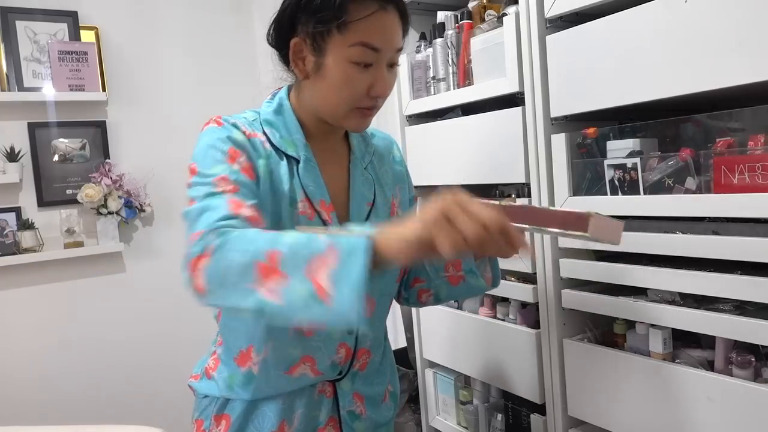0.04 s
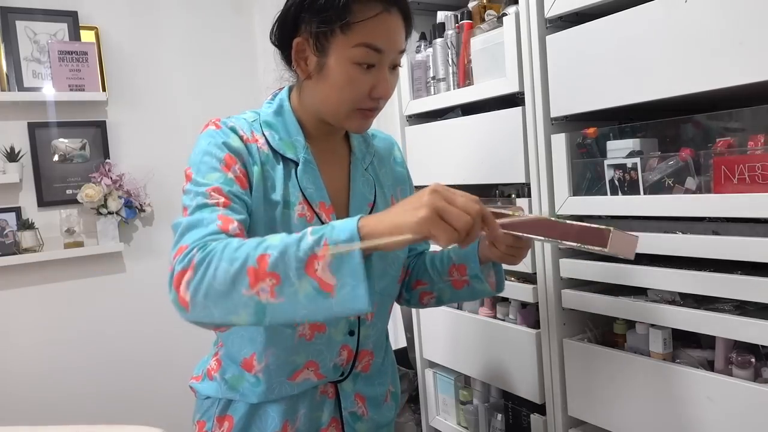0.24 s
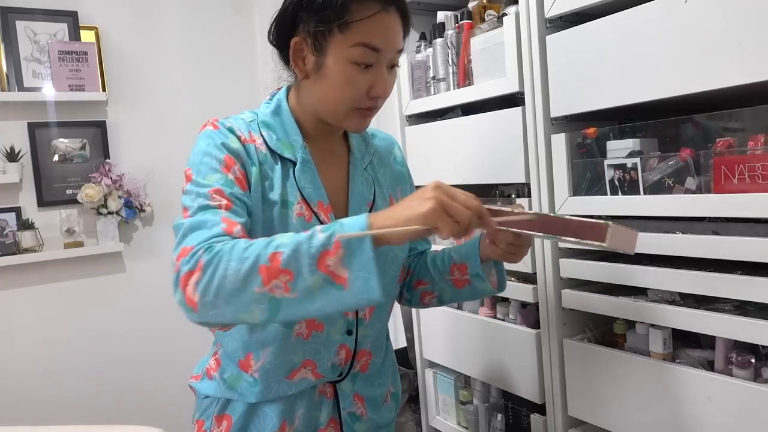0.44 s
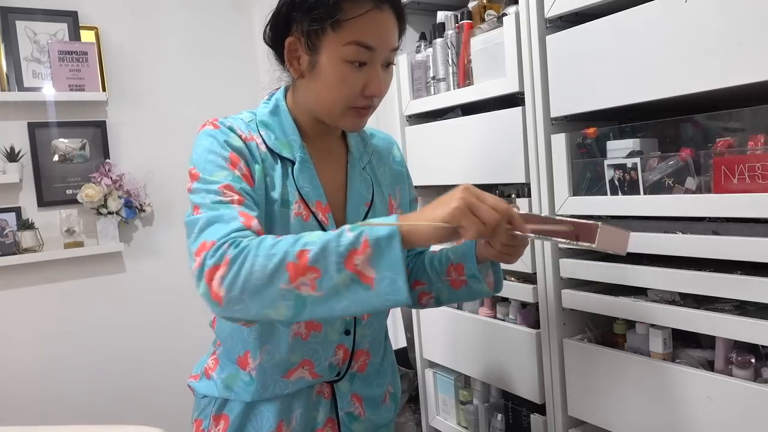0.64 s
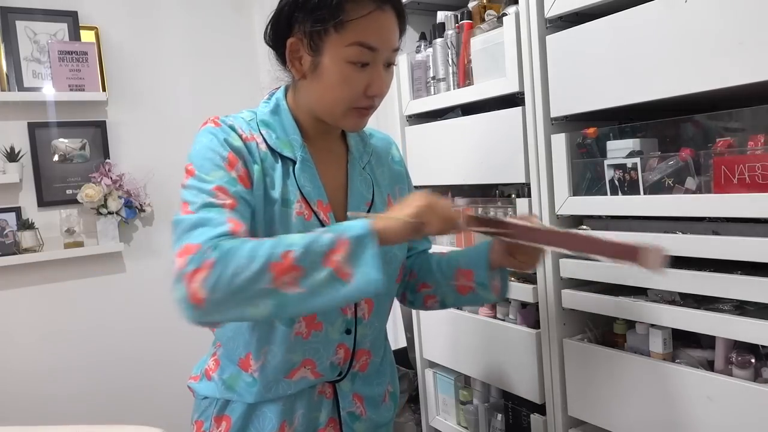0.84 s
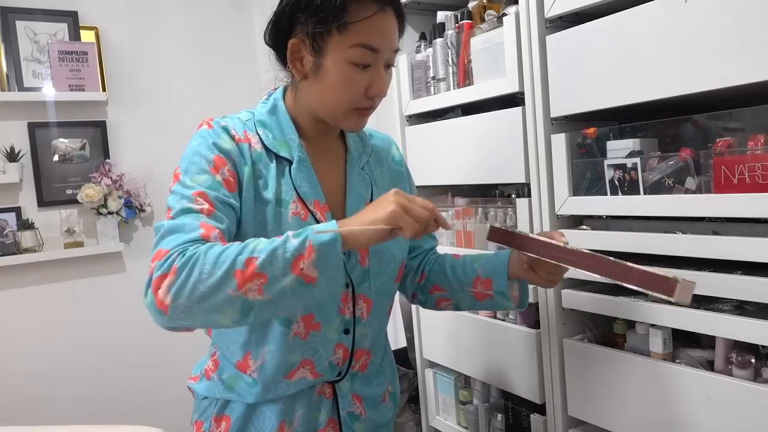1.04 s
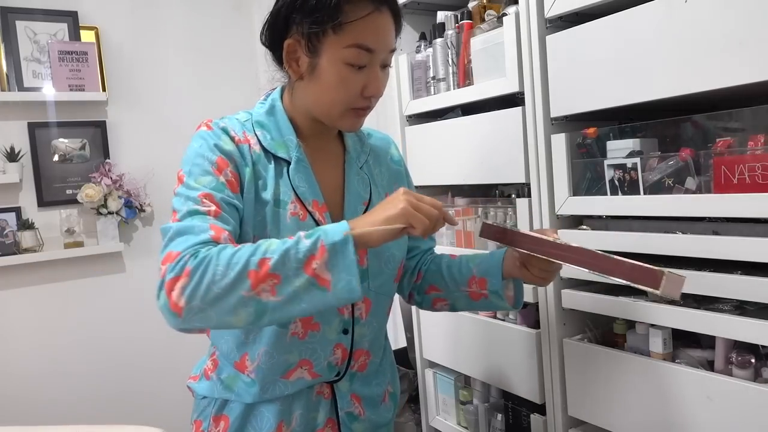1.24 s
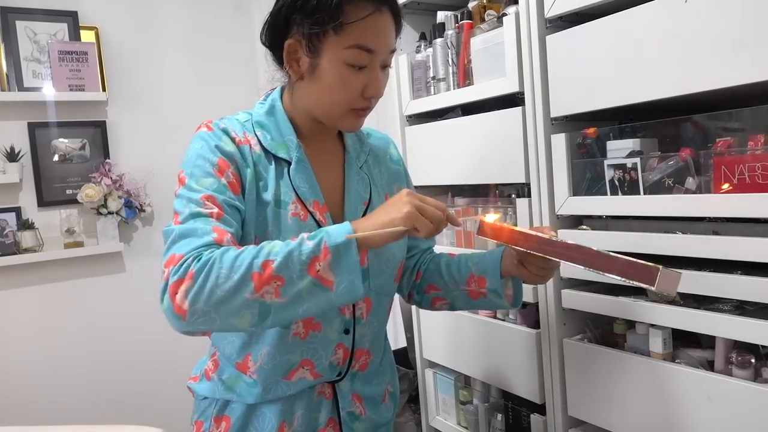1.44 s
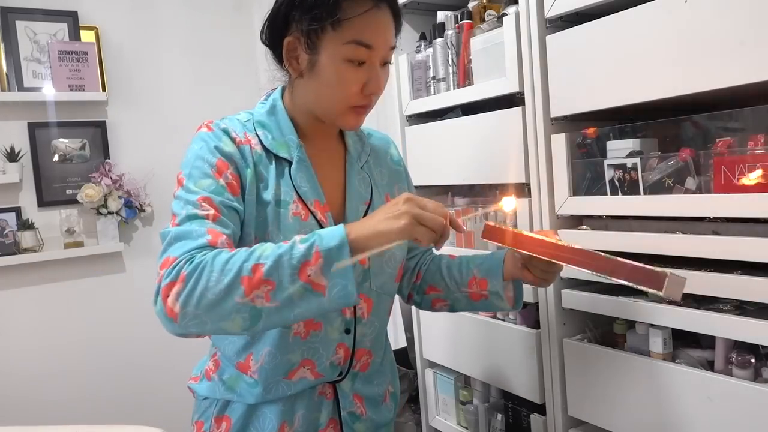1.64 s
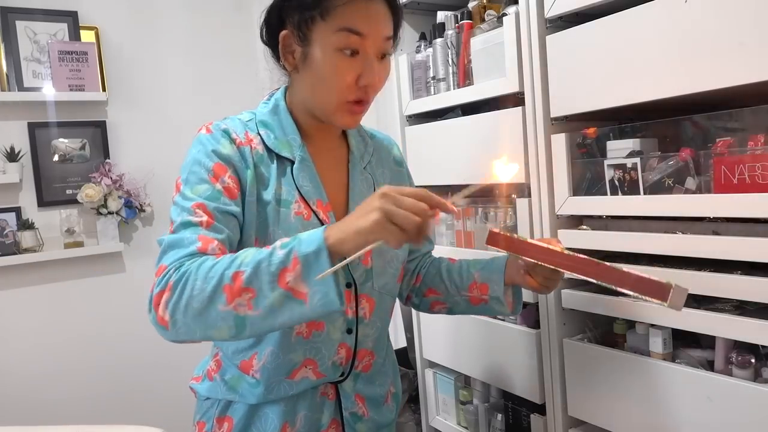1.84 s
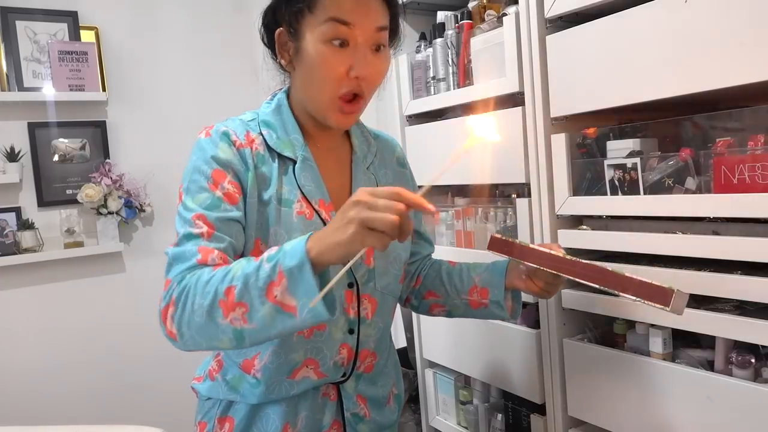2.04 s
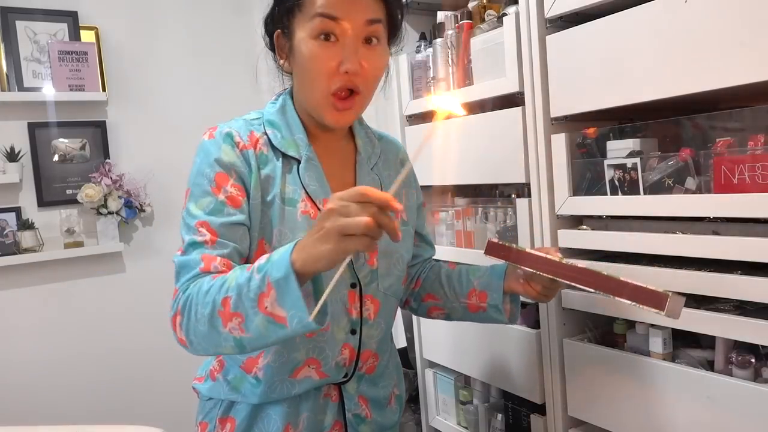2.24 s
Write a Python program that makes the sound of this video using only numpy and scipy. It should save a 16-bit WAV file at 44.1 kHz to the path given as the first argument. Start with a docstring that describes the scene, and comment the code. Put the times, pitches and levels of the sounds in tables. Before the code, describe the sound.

A long match is struck on its cardboard box, close up in a small, quiet room. The end of an earlier scrape dies away at once; a very faint tap comes near 0.3 seconds. At 0.74 the head taps down, rasps grittily, strongest around 0.87, and flicks off by 0.92. Faint fizzing follows, a soft dull pop at 1.48, then a quietly growing flare with tiny snaps around 1.8-2.0 over low room air.

```python
"""Small, quiet room: a long match is struck once along the side of its cardboard box.
The scrape of an earlier try dies away; then impulses ring box and stick as the head taps down and flicks off.
Between them random grains, coloured and ringing the box and stick, make the gritty rasp.
The head fizzes (flickering grains), catches with a soft pop (ringing puffs) and flares (smooth noise).
Small ringing snaps are dotted about; room air and a faint mains hum lie underneath."""
import sys
import numpy as np
from scipy import signal
from scipy.fft import rfft, irfft
from scipy.io import wavfile

SR = 44100
rng = np.random.default_rng(int(sys.argv[2]) if len(sys.argv) > 2 else 0)


def put_to_file(sound):
    """Save the sound as 16-bit audio at rate SR, in the file named by the first command-line argument."""
    columns = np.atleast_2d(sound).T  # one column per channel
    safe = np.clip(columns, -1, 1)
    whole_steps = np.round(safe * 32767)
    wavfile.write(sys.argv[1], SR, whole_steps.astype(np.int16))


N = 100680
TIME = np.arange(N) / SR
CUTOFF_HZ = 15900


def from_db(db):
    """Decibels to amplitude gain."""
    return 10 ** (np.asarray(db) / 20)


def rms_one(x):
    """Scale to unit power."""
    return x / np.sqrt(np.mean(x ** 2) + 1e-20)


def level(rows, column=1):
    """Gain over time, interpolated in dB from one column; near silent before the first row."""
    rows = np.array(rows)
    return from_db(np.interp(TIME, rows[:, 0], rows[:, column], left=-150))


def colour(x, spectrum):
    """Filter by a spectrum interpolated over log frequency, then scale to unit power."""
    hz, db = np.transpose(spectrum)
    bin_hz = np.maximum(np.arange(N // 2 + 1) * SR / N, 1)
    gain = from_db(np.interp(np.log(bin_hz), np.log(hz), db))
    in_band = (bin_hz < CUTOFF_HZ) * (bin_hz > 20)
    return rms_one(irfft(rfft(x) * gain * in_band, N))


def noise(spectrum):
    """Smooth coloured Gaussian noise of unit power."""
    return colour(rng.standard_normal(N), spectrum)


def flicker(corner_hz, depth_db):
    """Randomly wavering gain: low-passed noise in dB, depth as rms."""
    pole = np.exp(-2 * np.pi * corner_hz / SR)
    waver = signal.lfilter([1], [1, -2 * pole, pole * pole], rng.standard_normal(N))
    return from_db(depth_db * rms_one(waver))


def grains(rate_per_s, spread_db):
    """Random impulses of either sign, their sizes exponentially spread in dB."""
    sizes = from_db(spread_db * np.minimum(rng.exponential(1, N), 4))
    signs = rng.choice([-1, 1], N)
    return sizes * signs * (rng.random(N) < rate_per_s / SR)


def click(start_s, db):
    """One single-sample impulse."""
    return from_db(db) * (np.arange(N) == int(start_s * SR))


def ring(x, modes):
    """Damped resonances in parallel, each blocking DC."""
    out = 0
    for hz, db, t60_s in modes:
        pole = np.exp(-np.log(1000) / (t60_s * SR))
        angle = 2 * np.pi * hz / SR
        feedback = [1, -2 * pole * np.cos(angle), pole * pole]
        # the tiny offset keeps the filter out of denormals
        out = out + from_db(db) * signal.lfilter([.5, 0, -.5], feedback, x + 1e-18)
    return out


def soften(x, hz):
    """A soft contact loses its treble: second-order low-pass."""
    return signal.sosfilt(signal.butter(2, min(hz, SR / 2 - 1), fs=SR, output="sos"), x)


def high_pass(x, order, hz):
    """Butterworth high-pass."""
    return signal.sosfilt(signal.butter(order, hz, "high", fs=SR, output="sos"), x)


def room(x, wet_db):
    """Direct sound, near reflections and a short diffuse tail whose treble dies sooner."""
    # Reflections off nearby surfaces. Each row: delay in seconds, level in dB.
    echoes = [(.0021, -18), (.0053, -18.5)]
    t60_s, treble_t60_s, treble_hz, build_s = .27, 0.24, 9400, 0.0077
    t = TIME[:SR // 2]
    bin_hz = np.arange(len(t) // 2 + 1) * SR / len(t)
    white = rng.standard_normal(len(t))
    low = irfft(rfft(white) / (1 + (bin_hz / treble_hz) ** 4), len(t))
    low_tail = low * np.exp(-np.log(1000) * t / t60_s)
    treble_tail = (white - low) * np.exp(-np.log(1000) * t / treble_t60_s)
    tail = (low_tail + treble_tail) * (1 - np.exp(-t / build_s))
    response = from_db(wet_db) * tail / np.linalg.norm(tail)
    response[0] += 1  # direct sound
    for delay_s, db in echoes:
        response[int(delay_s * SR)] += from_db(db)
    return signal.fftconvolve(x, response)[:N]


def room_air():
    """Still air of the room: steady coloured noise."""
    # Each row: frequency in Hz, relative density in dB per Hz.
    air_colour = [(15, -72), (25, -42), (64, -18.5), (82, -14), (102, -7), (126, -11.5), (194, -15.5),
                  (437, -21.5), (572, -23.5), (672, -22.5), (1390, -31.5), (2090, -33), (2330, -38),
                  (10800, -33), (15800, -31)]
    return from_db(-71.5) * noise(air_colour)


def air_width():
    """Side-channel noise that widens the air."""
    # Each row: frequency in Hz, relative density in dB per Hz.
    side_colour = [(40, -18), (110, -2.5), (250, -2), (700, -8.5), (2000, -24.5), (6000, -26),
                   (12000, -10.5), (15800, -10.5)]
    return from_db(-87.5) * noise(side_colour)


def mains_hum():
    """Faint sine with a slight waver in level."""
    hum_hz, hum_rms_db, waver_db = 99.2, -73, 0.1
    sine = np.sqrt(2) * np.sin(2 * np.pi * hum_hz * TIME)
    return from_db(hum_rms_db) * flicker(15, waver_db) * sine


def earlier_try():
    """Flickering grains of an earlier scrape fade exponentially while the head brushes back over the box."""
    # Scrape. Each row: frequency in Hz, relative density in dB per Hz.
    scrape_colour = [(200, -7), (450, -9.5), (650, 7.5), (900, -6.5), (2000, -0.5), (4000, 0.5), (6300, 5),
                     (9000, 0.5), (13000, 0), (16000, -12)]
    # Brush. Each row: time in seconds, level in dB.
    brush_level = [(0, -57.5), (.06, -75.5), (.088, -63), (.125, -70.5), (.15, -76.5), (.2, -78),
                   (.27, -85), (.4, -110)]
    # Brush. Each row: frequency in Hz, relative density in dB per Hz.
    brush_colour = [(300, -14), (700, -0.5), (1200, 2), (2000, -10.5), (5000, -10), (15000, -22)]
    start_db, fade_db_per_s = -47, 228
    fade = from_db(start_db - fade_db_per_s * TIME)
    dying = fade * flicker(100, 0.64) * colour(grains(12000, 2.0), scrape_colour)
    brush = level(brush_level) * colour(grains(4000, 3.8), brush_colour)
    return dying + brush


def snaps():
    """Tiny impulses, each ringing one brief mode, with the bass removed."""
    # Each row: start in seconds, impulse level in dB, pitch in Hz, t60 in seconds.
    snap_rows = [(0.1645, -39, 6550, 0.00014), (1.832, -44, 10000, 0.0012), (1.902, -34.5, 3700, 0.0042),
                 (1.9044, -40, 4650, 0.0045), (1.9056, -50, 4400, .003), (1.988, -47.5, 2460, 0.0099)]
    rings = 0
    for start_s, db, hz, t60_s in snap_rows:
        rings = rings + soften(ring(click(start_s, db), [(hz, 0, t60_s)]), hz=1.8 * hz)
    return room(high_pass(rings, order=3, hz=2830), wet_db=-8.5)


def knocks():
    """Impulses as match meets cardboard: hollow taps, clicks of stick and hard tip, a thud on landing."""
    # Each row: start in seconds, tap impulse level in dB, pitch in Hz, t60 in seconds,
    # hard click in dB relative to the tap.
    knock_rows = [(0.3336, -47, 465, 0.019, -55), (.7388, -28, 1200, 0.018, -8),
                  (0.7773, -35.5, 926, 0.029, -5), (.9125, -30, 1026, 0.013, -20),
                  (.975, -47, 775, 0.021, -25)]
    # Stick. Each row: frequency in Hz, relative level in dB, t60 in seconds.
    stick_modes = [(3360, 0, 0.0049), (4400, -16, 0.0059)]
    # Box thudding in the hand. Each row: frequency in Hz, relative level in dB, t60 in seconds.
    thud_modes = [(108, -13, 0.099), (470, -30, 0.015), (876, 10.5, 0.024)]
    tip_mode = (13000, -3, .0012)  # Hz, dB, t60 in s
    taps, hard = 0, 0
    for start_s, db, hz, t60_s, hard_db in knock_rows:
        taps = taps + soften(ring(click(start_s, db), [(hz, 0, t60_s)]), hz=1.7 * hz)
        hard = hard + click(start_s, db + hard_db)
    clicks = soften(ring(hard, stick_modes), hz=4230) + ring(hard, [tip_mode])
    landing_s, landing_db = knock_rows[1][0], -44
    thud = soften(ring(click(landing_s, landing_db), thud_modes), hz=1200)
    return room(taps + clicks + thud, wet_db=-8.5)


def scrape():
    """Grit breaks under the juddering head: rasp, deeper bite and fine sizzle, with stick and box ringing."""
    # Each row: time in seconds, gritty hiss in dB, box ring in dB, fine top sizzle in dB.
    stroke = [(.748, -62, -67, -77), (.757, -52.5, -49, -62), (.781, -42.5, -45, -47),
              (.8, -42, -46.5, -44.5), (.825, -41.5, -50, -43), (.845, -36.5, -45, -37.5),
              (.87, -34, -41, -42), (.9, -37.5, -48, -51), (.914, -41.5, -51.5, -46), (.922, -61, -62, -67)]
    # Hiss, bite and sizzle. Each row: frequency in Hz, relative density in dB per Hz.
    hiss_colour = [(60, -70), (400, -37)] + list([(880, -47), (1500, -10), (2080, -11.5), (2500, -10.5),
                                                  (4020, -4), (4570, -6), (9010, -7.5), (11300, -2),
                                                  (12500, -0.5), (13500, -3), (15800, -10.5)])
    bite_colour = [(50, -50), (120, -49), (200, -0.5), (330, 4.5), (600, -3.5), (1400, -2.5), (2000, 3.5),
                   (2450, -1.5), (3100, -9.5), (6000, 2.5), (9000, 5.5), (15000, -6.5)]
    sizzle_colour = [(4000, -54), (9500, -13), (11500, -3), (13500, 1), (14600, -1), (15800, -14)]
    # Box and long wooden stick. Each row: frequency in Hz, relative level in dB, t60 in seconds.
    box_modes = [(435, -24, 0.12), (690, -6.5, 0.019), (875, 1, 0.023), (972, -3, 0.024),
                 (1250, -0.5, 0.0093), (1830, -20, 0.023)]
    wood_modes = [(1886, -43, 0.022), (2990, -35, 0.035), (3672, -37.5, .035), (3970, -44.5, 0.014),
                  (4930, -44, .03), (6200, -48, .04), (9800, -43, 0.053), (13500, -41, .012)]
    judder_hz, judder_db = 360, 1.0
    # Gaussian swell, late in the stroke; rise and fall are standard deviations
    bite_s, bite_db, bite_rise_s, bite_fall_s = .874, -37, 0.017, 0.027
    contact = flicker(judder_hz, judder_db) * (TIME < stroke[-1][0])
    hiss = level(stroke) * colour(grains(16000, 3), hiss_colour)
    box_ring = rms_one(soften(ring(grains(2500, 3.9), box_modes), hz=2780))
    box = level(stroke, column=2) * box_ring
    width_s = np.where(TIME < bite_s, bite_rise_s, bite_fall_s)
    swell = np.exp(-.5 * ((TIME - bite_s) / width_s) ** 2)
    bite = from_db(bite_db) * swell * colour(grains(6000, 3.1), bite_colour)
    sizzle = level(stroke, column=3) * colour(grains(20000, 2.2), sizzle_colour)
    rasp = contact * (hiss + bite + sizzle)
    return room(rasp + ring(rasp, wood_modes) + contact * box, wet_db=-9)


def patchy(spectrum, patchy_db):
    """Fine grains in bands that swell and sink independently, over a steady share."""
    edges_hz = np.geomspace(1500, 15800, 15)
    out = grains(20000, 1.1) * from_db(-12.5)
    for low_hz, high_hz in zip(edges_hz, edges_hz[1:]):
        band = signal.butter(2, [low_hz, high_hz], "band", fs=SR, output="sos")
        out = out + signal.sosfilt(band, grains(22000, 2.6)) * flicker(4, patchy_db)
    return colour(out, spectrum)


def burning():
    """The head fizzes as patchy grains while the flame grows as flickering smooth noise."""
    # Fizz and flare. Each row: time in seconds, level in dB.
    fizz_level = [(.9, -92), (1.0, -74), (1.08, -72), (1.15, -71), (1.42, -68.5), (1.6, -72), (1.74, -70.5),
                  (1.85, -69), (2.0, -68.5), (2.28, -68.5)]
    flare_level = [(.95, -83), (1.15, -75.5), (1.44, -75), (1.56, -74.5), (1.75, -70), (2.0, -68.5),
                   (2.28, -66.5)]
    # Fizz and flare. Each row: frequency in Hz, relative density in dB per Hz.
    fizz_colour = [(300, -25)] + list([(1060, -9), (1800, -5), (2590, -11), (3460, -0.5), (6540, 1),
                                       (7710, 2), (8990, 0), (12800, 3), (15100, -5), (15800, -13)])
    flare_colour = [(80, -18), (160, -1), (400, -2), (1100, -2.5), (1800, -7.5), (3500, -11), (8000, -23)]
    fizz = level(fizz_level) * flicker(40, 0.56) * patchy(fizz_colour, patchy_db=1.0)
    flare = level(flare_level) * flicker(25, 1.0) * noise(flare_colour)
    return fizz + flare


def ignition():
    """The head catches: a quick sputter of impulses rings damped modes into a dull pop."""
    # Each row: start in seconds, impulse level in dB.
    puff_rows = [(1.4779, -41), (1.4803, -39), (1.4851, -47), (1.4871, -58), (1.494, -57)]
    # Each row: frequency in Hz, relative level in dB, t60 in seconds.
    pop_modes = [(123, -6.5, 0.036), (210, -3, 0.023), (434, -15.5, 0.025), (612, -4.5, 0.034),
                 (1025, -2, 0.02), (1620, -35, 0.0079), (2990, -14, 0.022)]
    puffs = sum(click(start_s, db) for start_s, db in puff_rows)
    thump = high_pass(ring(puffs, pop_modes), order=2, hz=90)
    return room(soften(thump, hz=2000), wet_db=-7.5)


def scene():
    """Sources sit in the middle; the sides hold air noise and a trace of the reverberated middle."""
    background = room_air() + mains_hum()
    match = earlier_try() + snaps() + knocks() + scrape() + burning() + ignition()
    mid = background + match
    side = air_width() + from_db(-73) * room(mid, wet_db=-18)
    return np.array([mid + side, mid - side])


def record(dry):
    """The microphone's bass rolls off and the top is cut steeply."""
    thin = high_pass(dry, order=3, hz=60)
    return signal.sosfilt(signal.ellip(12, .1, 80, CUTOFF_HZ, fs=SR, output="sos"), thin)


dry = scene()
out = record(dry)
put_to_file(out)
```